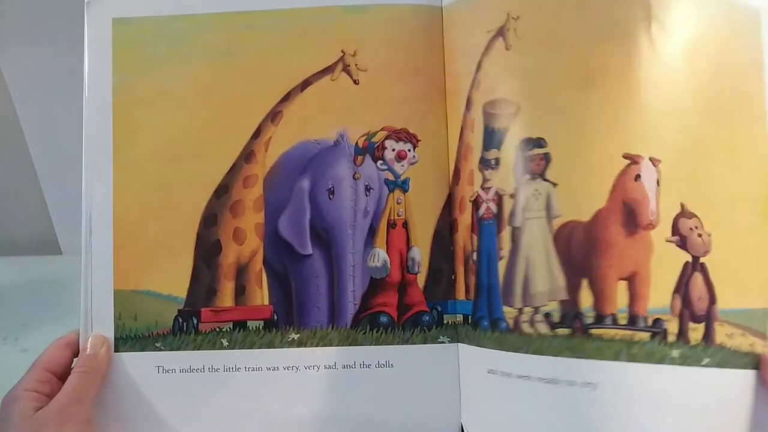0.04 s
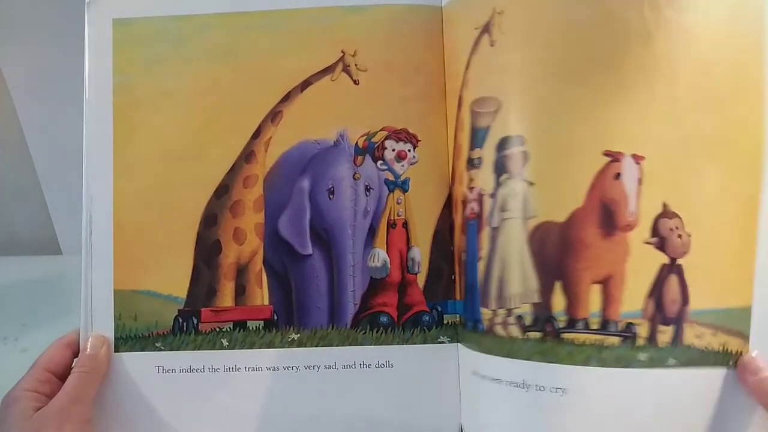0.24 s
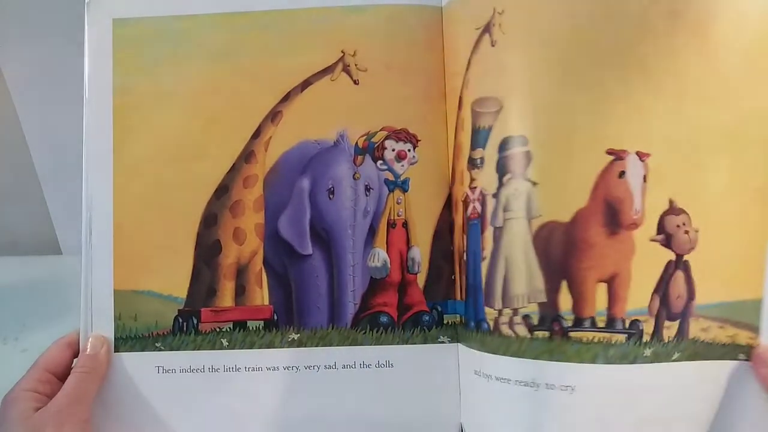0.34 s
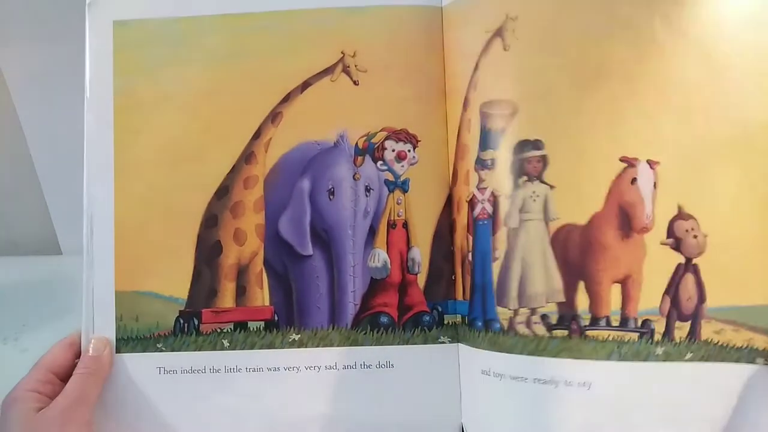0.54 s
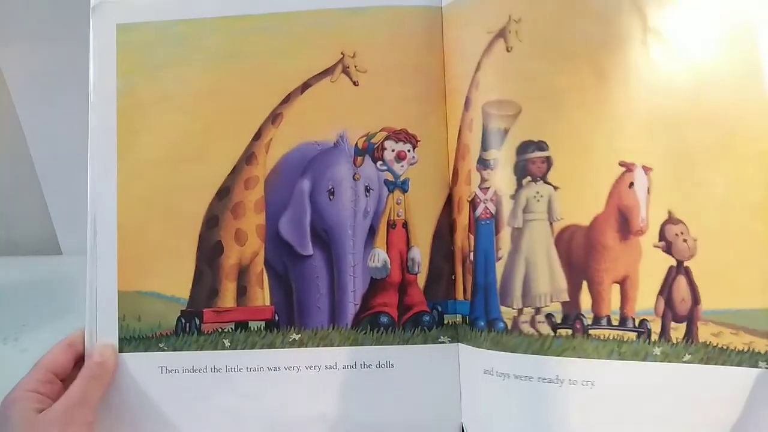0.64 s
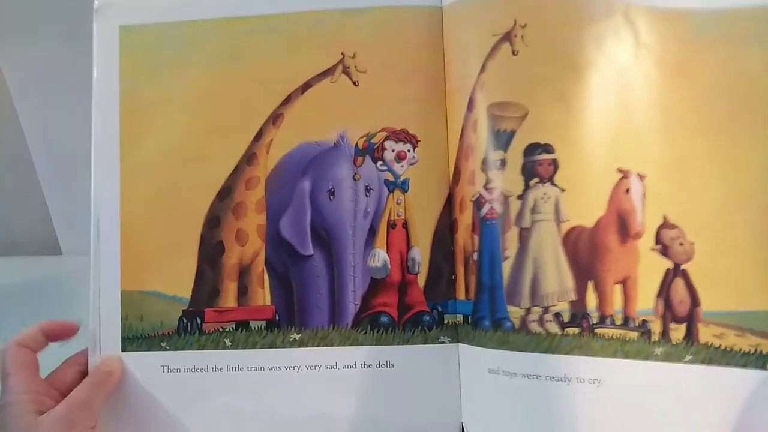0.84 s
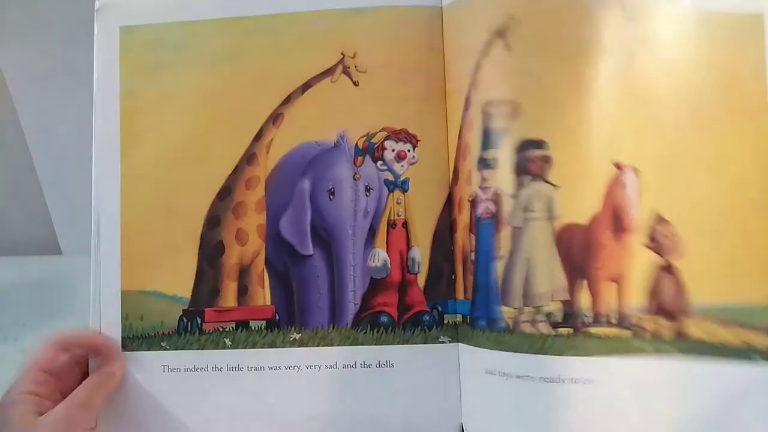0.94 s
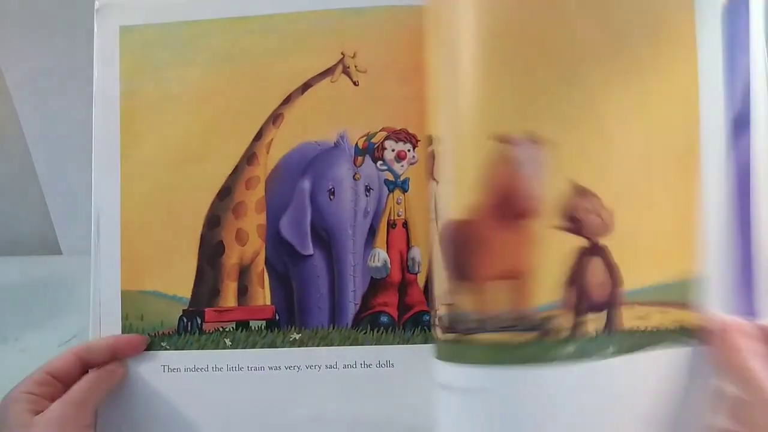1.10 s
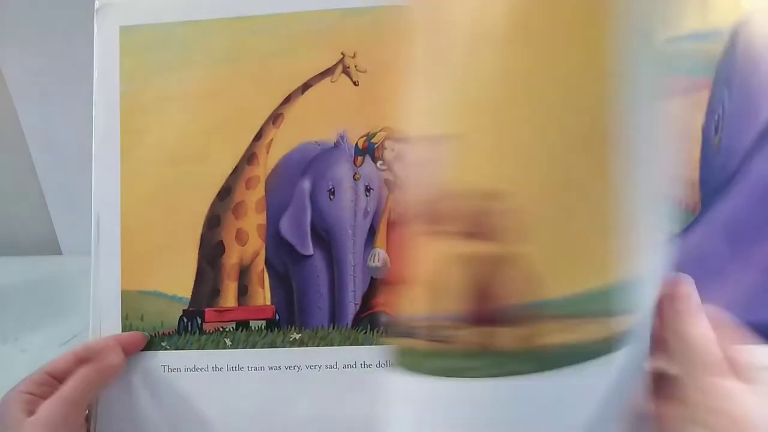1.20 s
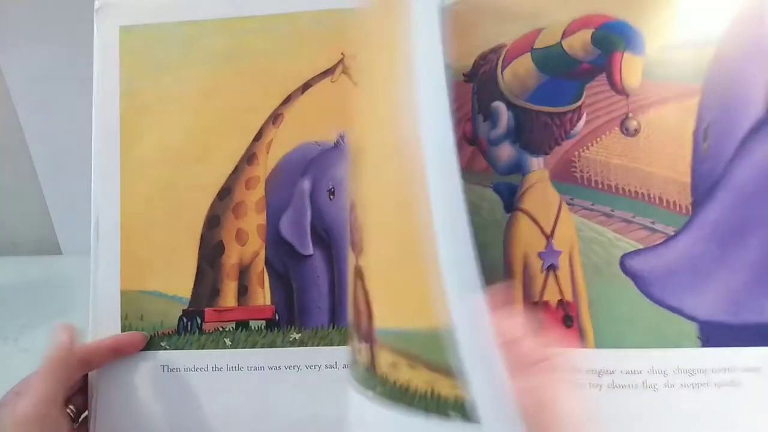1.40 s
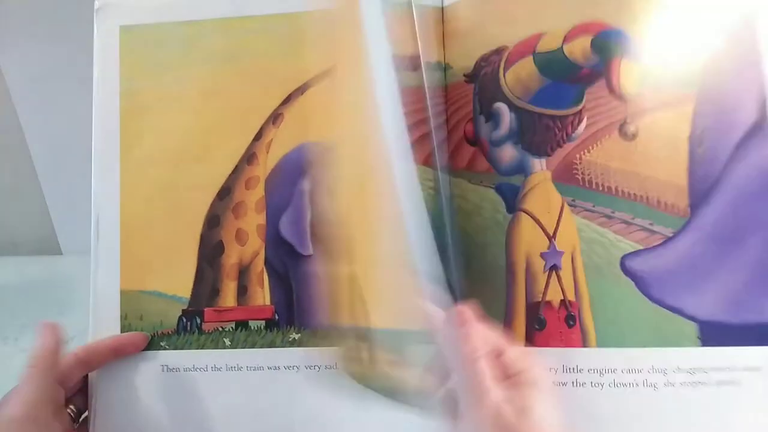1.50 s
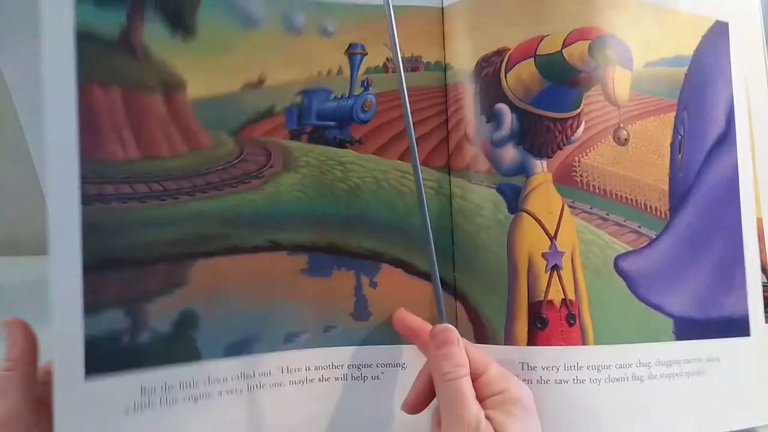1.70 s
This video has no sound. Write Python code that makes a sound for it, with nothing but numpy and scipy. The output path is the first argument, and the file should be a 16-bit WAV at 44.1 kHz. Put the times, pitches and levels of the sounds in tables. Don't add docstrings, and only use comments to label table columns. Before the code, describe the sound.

Page turn of a picture book: soft paper rubbing, dull pops, then sharp crease snaps

```python
import sys
import numpy as np
from scipy import signal
from scipy.fft import rfft, irfft
from scipy.io import wavfile
from scipy.ndimage import uniform_filter1d

SR = 44100
rng = np.random.default_rng(int(sys.argv[2]) if len(sys.argv) > 2 else 0)


def master_out(mix):
    frames = np.transpose(np.atleast_2d(mix))
    ceiling = np.clip(frames, -1, 1)
    pcm = np.round(ceiling * 32767).astype(np.int16)
    wavfile.write(sys.argv[1], SR, pcm)


def decibels_to_gain(level_db):
    exponent = np.asarray(level_db, float) / 20
    return 10 ** exponent


N = 77175

# frequency in Hz, level in dB.
HISS_COLOUR = [(25, -43), (60, -13), (110, -22), (220, -28), (1300, -38.5), (4000, -36.5), (16000, -40)]
# start in seconds, rise in seconds, hold in seconds, effort in dB, pitch in Hz.
FLEX_STROKES = [(0.074, 0.021, .14, -71, 695), (0.325, 0.04, 0.27, -72, 517),
                (0.429, 0.023, 0.032, -69.5, 320), (0.71, 0.016, 0.055, -60, 288),
                (0.527, 0.084, 0.053, -59, 656), (0.63, 0.011, 0.026, -61, 670),
                (0.708, 0.021, 0.043, -48.5, 700), (0.845, 0.018, 0.032, -66.5, 1130),
                (0.98, 0.0027, 0.044, -47, 724), (1.047, 0.0097, 0.057, -54.5, 420),
                (1.148, 0.012, 0.056, -45, 740), (1.179, 0.01, 0.078, -52, 485),
                (1.215, .01, 0.017, -59.5, 1590), (1.313, 0.0041, 0.03, -50, 853),
                (1.421, 0.0099, 0.0063, -70.5, 500), (1.539, 0.017, 0.02, -65.5, 1130),
                (1.641, 0.0062, 0.025, -81, 300)]
# frequency in Hz, level in dB.
SHEET_MODES = [(110, -11), (190, 3.5), (280, 14), (440, -2), (526, 4.5), (640, 1.5), (736, -1.5),
               (882, -0.5), (1040, 1), (1200, -7.5), (1390, -8.5), (1560, -16), (1920, -10), (2400, -31.5)]
# start in seconds, rise in seconds, hold in seconds,
# pressure in dB, release T60 in seconds.
THUMB_STROKES = [(.09, 0.022, 0.078, -55.5, 0.38), (.19, 0.025, 0.11, -52, 0.14),
                 (.29, 0.027, 0.26, -49, 0.24), (.44, 0.014, 0.13, -47.5, 0.61),
                 (.67, 0.0062, 0.02, -48, 0.68), (.77, 0.026, 0.0061, -46.5, 0.22),
                 (.865, 0.029, 0.012, -50.5, 0.082), (.895, 0.028, 0.029, -44.5, 0.033),
                 (.958, 0.0073, 0.0055, -46.5, 0.12), (1.027, 0.0039, 0.063, -44, 0.19),
                 (1.07, 0.016, 0.02, -45, 0.68), (1.14, 0.0092, 0.016, -59, 0.19),
                 (1.2, 0.0062, 0.032, -70.5, 0.086), (1.32, 0.0037, 0.056, -61.5, 0.14),
                 (1.375, 0.0044, 0.044, -53, 0.16), (1.585, 0.014, 0.041, -78.5, 0.17)]
# frequency in Hz, level in dB.
THUMB_COLOUR = [(1500, -23.5), (4200, -17), (6000, -6), (8500, -4.5), (11300, 4), (15100, -9), (15700, -41)]
# start in seconds, body in dB, pitch in Hz, fizz in dB.
NAIL_TICKS = [
    (0.094, -51.5, 1180, -46),
    (.111, -70, 9000, -64),
    (0.1222, -43, 10000, -38),
    (.224, -69, 8850, -59),
    (.885, -53.5, 9000, -37),
    (.921, -52, 9000, -26),
    (1.076, -48, 9070, -33),
    (1.133, -44, 4500, -24.5),
]
# start in seconds, rise in seconds, hold in seconds,
# pressure in dB, release T60 in seconds.
EDGE_STROKES = [
    (.245, 0.027, 0.056, -50.5, .15),
    (.8, 0.015, 0.026, -56.5, 0.24),
    (.91, 0.015, 0.036, -60, 0.15),
    (1.555, .005, 0.0096, -79, .08),
    (1.588, 0.0032, 0.02, -64, 0.092),
    (1.635, .005, 0.0085, -73, .12),
]
# start in seconds, rise in seconds, hold in seconds,
# pressure in dB, release T60 in seconds.
SLIDE_STROKES = [(.275, 0.059, 0.036, -46, 1), (.46, 0.031, 0.029, -47.5, 1),
                 (.69, .012, 0.0034, -48.5, 0.15), (.74, 0.0045, 0.0089, -54, 0.13),
                 (.865, 0.041, 0.033, -61.5, 0.71), (.99, 0.023, 0.032, -52.5, 0.25),
                 (1.03, 0.037, 0.075, -50.5, 0.06), (1.145, 0.0078, 0.013, -44.5, 0.18),
                 (1.19, 0.0034, 0.0051, -50.5, 0.29), (1.27, 0.015, 0.0074, -55, 0.11),
                 (1.32, 0.0024, 0.051, -52.5, 0.18), (1.378, 0.016, 0.019, -51.5, 0.16),
                 (1.545, 0.0037, 0.053, -68.5, 0.1)]
# frequency in Hz, level in dB.
SLIDE_COLOUR = [(150, -26.5), (600, -8), (1300, -6.5), (2300, -8), (4000, -3), (6500, -12), (11500, -15),
                (15500, -40)]
# time in seconds, frequency in Hz, resonance in dB.
AIR_GAP = [
    (.33, 2340, 2),
    (.6, 2080, 2),
    (0.678, 2380, -21),
]
# start in seconds, body in dB, pitch in Hz, fizz in dB.
CREASE_SNAPS = [(.438, -32.5, 1190, -30.5), (0.555, -39, 2950, -33), (0.701, -35, 3120, -24.5),
                (0.7923, -57, 6300, -27), (0.8667, -44, 1300, -44), (1.0272, -32.5, 1470, -31),
                (1.1496, -41.5, 4500, -34.5), (1.158, -26.5, 6640, -30.5), (1.162, -33.5, 2170, -35.5),
                (1.1658, -18, 3880, -13.5), (1.169, -34, 5000, -37), (1.194, -36, 2020, -27),
                (1.3197, -35.5, 1560, -28), (1.3728, -29, 3130, -11), (1.3954, -29, 2120, -30.5),
                (1.477, -51.5, 1630, -64), (1.552, -52, 3650, -72.5), (1.565, -42, 2080, -69.5),
                (1.64, -54, 6150, -69)]
# frequency in Hz, level in dB.
FIZZ_COLOUR = [(400, -26), (1500, -17.5), (3000, -2), (8000, 1.5), (11000, 9.5), (16500, -16)]
# start in seconds, peak in dB, pitch in Hz, shudder in seconds, ring T60 in seconds.
BUCKLES = [(0.511, -40.5, 637, 0.016, 0.016), (0.621, -31, 960, 0.009, 0.072),
           (0.745, -38.5, 950, 0.0046, 0.088), (0.619, -38.5, 472, 0.0098, 0.021),
           (0.9727, -41.5, 357, 0.0036, 0.0067), (0.989, -23.5, 2080, 0.0018, 0.024),
           (0.991, -34.5, 1140, .005, 0.013), (.989, -36, 470, 0.0058, 0.045),
           (1.027, -33.5, 600, 0.0039, 0.023), (1.194, -34, 1120, 0.024, 0.01),
           (1.196, -29.5, 530, 0.01, 0.13), (1.225, -35, 504, 0.0025, 0.031),
           (1.319, -39, 217, 0.0055, .03), (1.3193, -36.5, 710, 0.0024, 0.0099),
           (1.331, -49, 114.8, 0.0067, 0.03), (1.351, -51, 259, 0.0024, 0.09),
           (1.432, -54.5, 570, 0.013, 0.03), (1.42, -56, 280, 0.006, 0.032)]
# frequency in Hz, left over right in dB.
SHEET_SHADOW = [(100, 4), (300, 4), (700, 5.5), (2400, 7), (5500, 1), (12000, 20)]
SNAP_SHADOW = [(2000, 6), (6000, 3), (12000, 15)]
THUMB_SHADOW = [(600, 10), (3500, 6.5), (5500, 9.5), (8000, 18.5), (10200, 69), (13000, 29)]
EDGE_SHADOW = [(4000, 1.5), (8000, 11)]
# frequency in Hz, lead of the left port in radians.
PORT_LEAD = [(0, -1.5), (780, -2.5), (1890, -0.4), (6800, 6.5), (9560, 15.5), (16200, 29.5)]
# frequency in Hz, likeness from 0 to 1.
PORT_LIKENESS = [(150, 0.7), (700, .8), (2000, 0.55), (15000, .6)]


def evened(x):
    return x / np.sqrt(np.mean(x ** 2) + 1e-20)


def peaked(x):
    return x / abs(x[0]).max()


def read(points, hz):
    f, value = np.transpose(points)
    return np.interp(np.log(hz + 1), np.log(f + 1), value)


def level(strokes):
    t = np.arange(N) / SR
    power = 0
    for start, rise, hold, db, t60 in strokes:
        decay_db = 60 * np.maximum(t - start - rise - hold, 0) / t60
        swell = np.clip((t - start) / rise, 0, 1) ** 2
        power = power + (decibels_to_gain(db - decay_db) * swell) ** 2
    return np.sqrt(power)


def colour(x, points):
    log_gain = np.log(decibels_to_gain(read(points, abs(np.fft.fftfreq(4096, 1 / SR)))))
    taps = np.fft.ifft(np.exp(np.conj(signal.hilbert(log_gain)))).real[:2048]
    return signal.oaconvolve(x, taps[None], axes=1)[:, :x.shape[1]]


def ring(x, hz, width_hz):
    turn = np.exp(2j * np.pi * np.cumsum(hz * np.ones(x.shape[1])) / SR)
    r = np.exp(-np.pi * width_hz / SR)
    return 2 * (turn * signal.lfilter([1 - r], [1, -r], x / turn)).real


def ring_twice(x, hz, width_hz):
    return ring(ring(x, hz, width_hz), hz, width_hz)


def add(mix, start, sound):
    part = mix[:, round(start * SR):][:, :sound.shape[1]]
    part += sound[:, :part.shape[1]]


def scrape(per_s, spread_db, clump_db, clump_s):
    clump = evened(uniform_filter1d(rng.standard_normal(N), max(int(clump_s * SR), 1)))
    size = decibels_to_gain(spread_db * np.minimum(rng.exponential(1, N), 5) + clump_db * clump)
    slips = rng.random(N) < per_s / SR
    return evened(size * rng.standard_normal((2, N)) * slips)


def patchy(x):
    z = signal.stft(x, nperseg=256)[2]
    field = uniform_filter1d(rng.standard_normal(z.shape[1:]), size=5, axis=0)
    field = evened(uniform_filter1d(field, size=14, axis=1))
    return evened(signal.istft(z * decibels_to_gain(2.2 * field), nperseg=256)[1][:, :N])


def sheet(drive, hz, spread, t60):
    drive = ring_twice(drive, hz, hz * 1.1)
    modes = 0
    for f, db in SHEET_MODES:
        nearness = np.exp(-0.5 * (np.log(f / hz) / spread) ** 2)
        damping = 0.6 + f / 700
        mode = ring(drive, f, 2.2 * damping / max(t60, 0.005))
        modes = modes + decibels_to_gain(db) * nearness * mode / np.sqrt(damping)
    return evened(signal.lfilter(*signal.butter(2, min(hz * 0.23, 200), "high", fs=SR), modes))


def background():
    hum_hz = 59.5
    hiss = evened(colour(rng.standard_normal((2, N)), HISS_COLOUR))
    waver = evened(ring(rng.standard_normal((1, N)), hum_hz, 6.5))
    hum = 0.85 * waver + np.sin(2 * np.pi * hum_hz * np.arange(N) / SR)
    return decibels_to_gain(-78) * hiss * decibels_to_gain([[2], [1.5]]) + decibels_to_gain(-72) * hum * np.array([[1.3], [-0.8]])


def flex():
    out = np.zeros((2, N))
    creak = scrape(5000, 1.0, 1.9, 0.0087)
    for start, rise, hold, db, hz in FLEX_STROKES:
        at = round(start * SR)
        span = slice(at, at + SR // 3)
        shape = level([(start, rise, hold, db, 0.22)])[span]
        add(out, start, decibels_to_gain(4) * shape * sheet(creak[:, span], hz, spread=0.45, t60=0.037))
    return out


def thumb():
    rub = patchy(colour(scrape(16000, 1.3, 0.9, 0.002), THUMB_COLOUR))
    return decibels_to_gain(5) * level(THUMB_STROKES) * rub


def snaps(events):
    rise_s, crack_s, rattle_t60_s, q = 0.00033, 0.0008, 0.018, 1.97
    out, t = np.zeros((2, N)), np.arange(3000) / SR
    shape = np.exp(-t / crack_s) + 0.28 * decibels_to_gain(-60 * t / rattle_t60_s)
    for start, db, hz, fizz_db in events:
        burst = rng.standard_normal((2, 3000)) * np.minimum(t / rise_s, 1) * shape
        body = ring_twice(burst, hz, hz / q)
        fizz = colour(burst, FIZZ_COLOUR)
        add(out, start, decibels_to_gain(db) * peaked(body) + decibels_to_gain(fizz_db) * peaked(fizz))
    return out


def edge():
    whisper = ring_twice(scrape(6000, 1.4, 1.7, 0.004), 5700, 1300)
    return level(EDGE_STROKES) * evened(whisper)


def slide():
    rasp = patchy(colour(scrape(12000, 0.37, 1.26, 0.02), SLIDE_COLOUR))
    at, hz, db = np.transpose(AIR_GAP)
    t = np.arange(N) / SR
    gap = decibels_to_gain(np.interp(t, at, db)) * ring_twice(rasp, np.interp(t, at, hz), 900)
    return decibels_to_gain(6) * level(SLIDE_STROKES) * (rasp + gap)


def pops():
    out, t = np.zeros((2, N)), np.arange(6000) / SR
    for start, db, hz, shudder_s, t60 in BUCKLES:
        shape = np.exp(-t / max(shudder_s, 0.0005)) + 0.7 * np.exp(-t / 0.0008)
        drive = rng.standard_normal((2, 6000)) * shape * np.minimum(t * hz, 1)
        add(out, start, decibels_to_gain(db + 6) * peaked(sheet(drive, hz, spread=0.3, t60=t60)))
    return out


def ports(x, shadow):
    hz = np.fft.rfftfreq(N + 1024, 1 / SR)
    near, far = rfft(x, N + 1024)
    same = np.clip(read(PORT_LIKENESS, hz), 0, 1)
    lag = np.exp(-1j * np.interp(hz, *np.transpose(PORT_LEAD)))
    right = (same * lag * near + np.sqrt(1 - same ** 2) * far) / decibels_to_gain(read(shadow, hz))
    return np.array([x[0], irfft(right, N + 1024)[:N]])


def room(x):
    t = np.arange(8000) / SR
    echoes = rng.choice([-1., 1.], (2, 8000)) * (rng.random((2, 8000)) < 0.05) * (t > 0.002)
    tail = echoes * decibels_to_gain(-60 * t / 0.1) * decibels_to_gain([[0], [-4]])
    tail /= np.linalg.norm(tail[0])
    return decibels_to_gain(-13) * signal.fftconvolve(x, tail, axes=1)[:, :N]


def scene():
    paper = ports(flex() + slide() + pops(), SHEET_SHADOW)
    paper = paper + ports(thumb() + snaps(NAIL_TICKS), THUMB_SHADOW)
    paper = paper + ports(edge(), EDGE_SHADOW) + ports(snaps(CREASE_SNAPS), SNAP_SHADOW)
    return paper + room(paper) + background()


def roll_off(x):
    return signal.sosfilt(signal.butter(12, 16620, fs=SR, output="sos"), x)


def record(dry):
    dry = signal.oaconvolve(dry, signal.firwin(255, 16400, fs=SR)[None], "same", axes=1)
    hz, _, z = signal.stft(dry, SR, nperseg=1024)
    power = uniform_filter1d(abs(z) ** 2, size=16, axis=1)
    left, right = uniform_filter1d(power, size=3, axis=2)
    over_left = right * decibels_to_gain(2 * 24) > left
    over_own = right * decibels_to_gain(2 * 14) > right.mean(0)
    kept = (over_left & over_own) | (hz[:, None] < 11900)
    z = z * np.array([np.ones_like(kept), kept])
    mix = signal.istft(z, SR, nperseg=1024)[1][:, :N]
    return roll_off(mix)


dry = scene()
out = record(dry)
master_out(out)
```